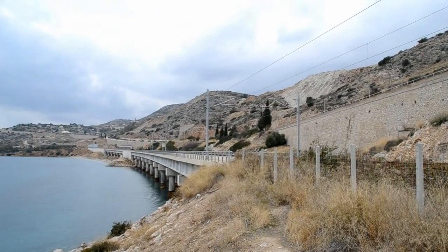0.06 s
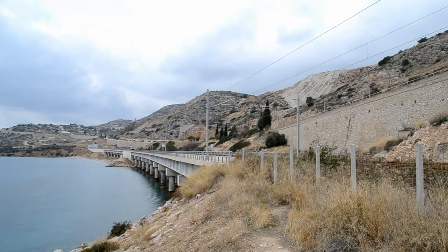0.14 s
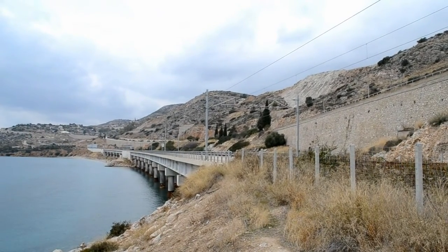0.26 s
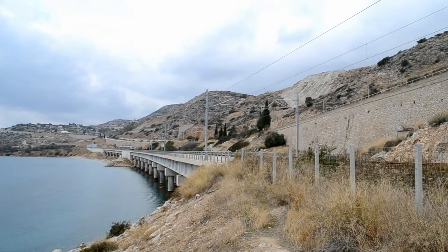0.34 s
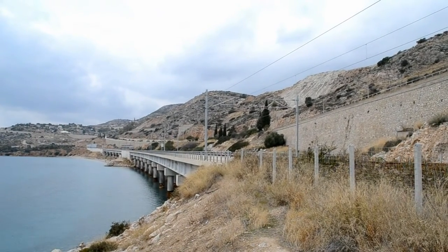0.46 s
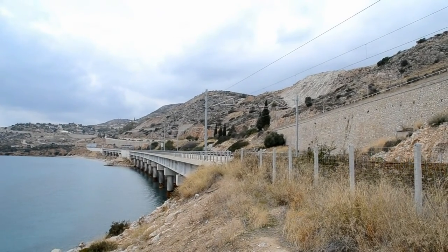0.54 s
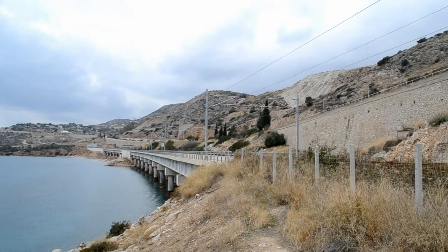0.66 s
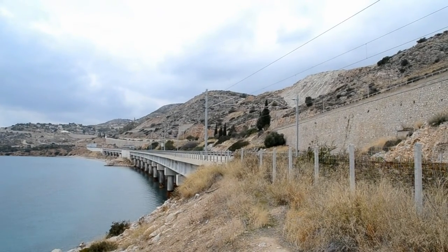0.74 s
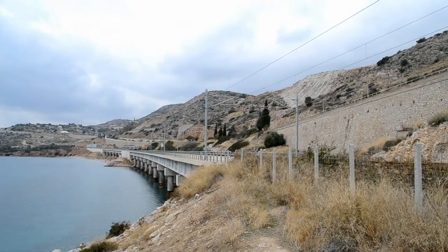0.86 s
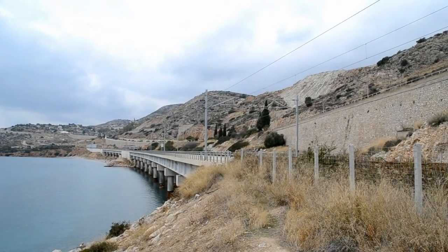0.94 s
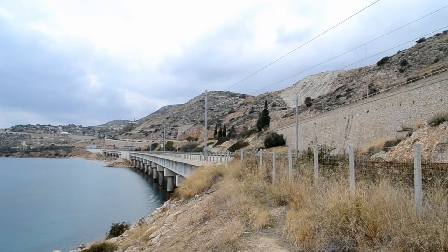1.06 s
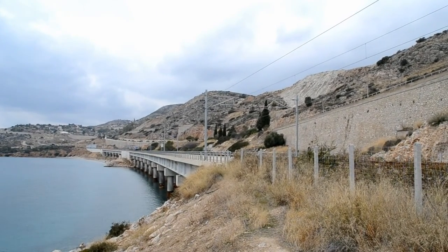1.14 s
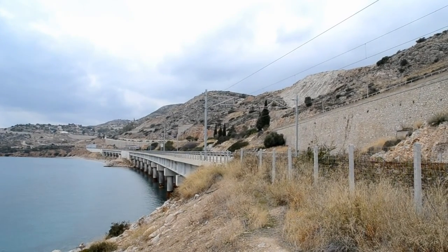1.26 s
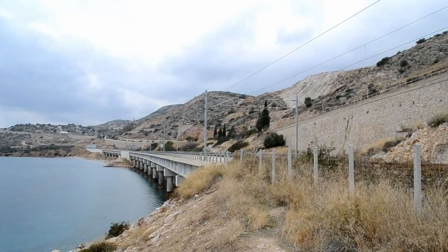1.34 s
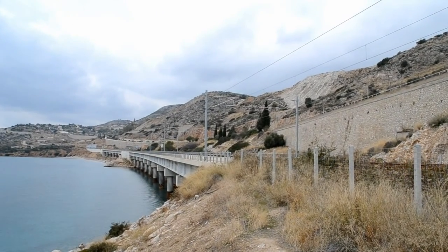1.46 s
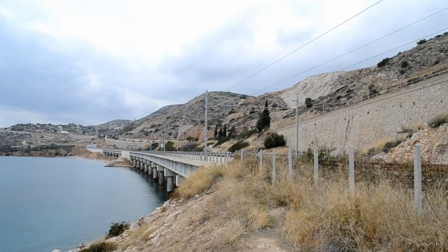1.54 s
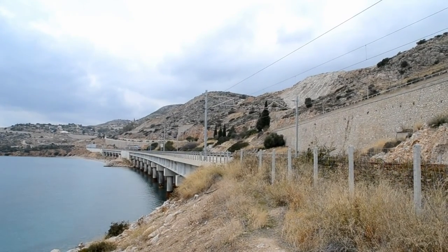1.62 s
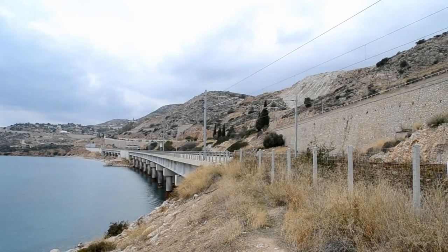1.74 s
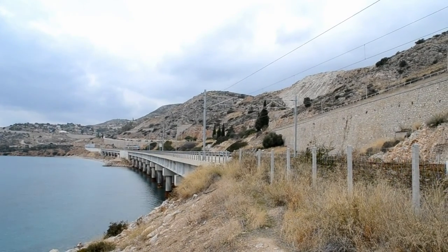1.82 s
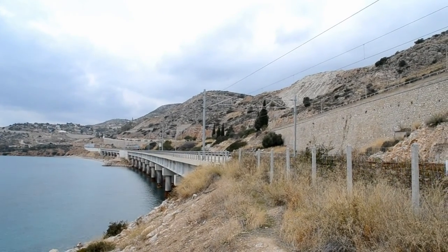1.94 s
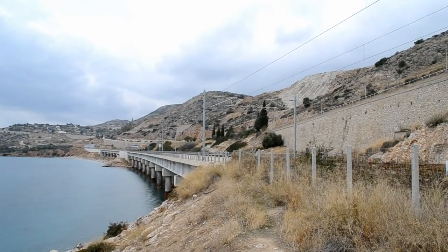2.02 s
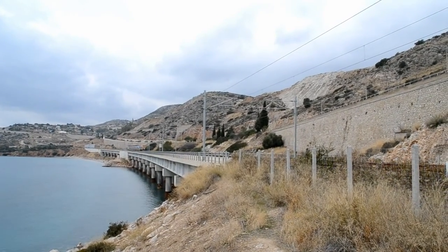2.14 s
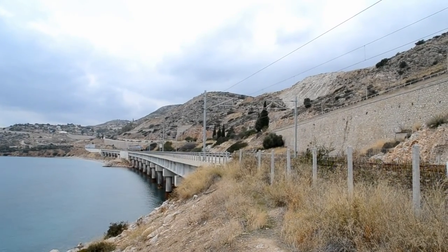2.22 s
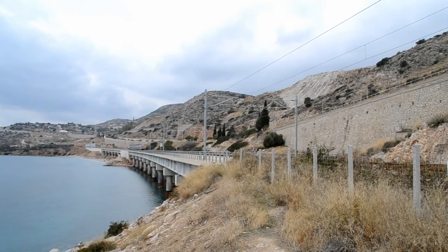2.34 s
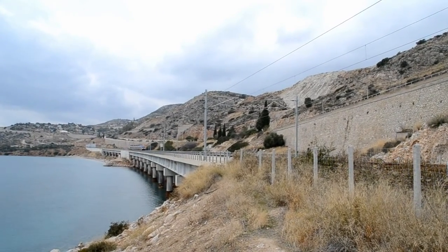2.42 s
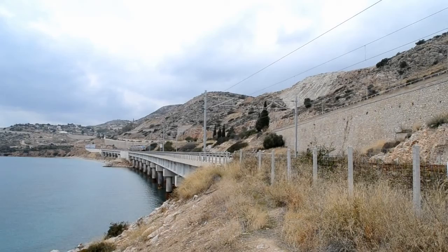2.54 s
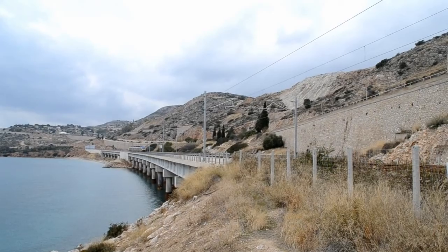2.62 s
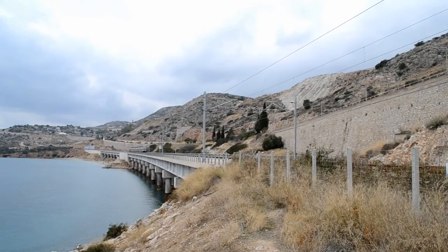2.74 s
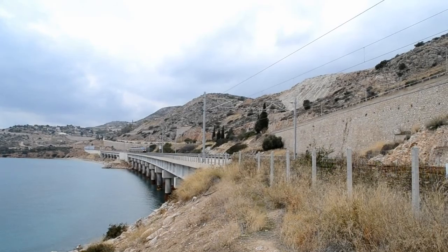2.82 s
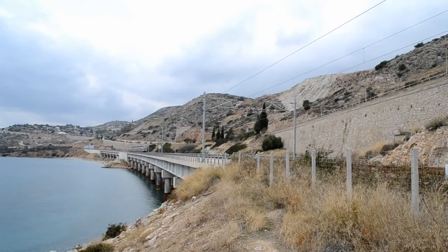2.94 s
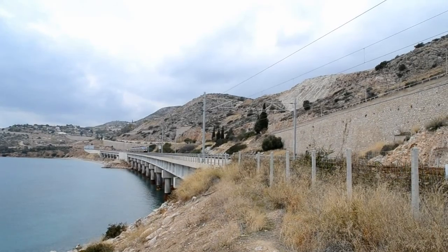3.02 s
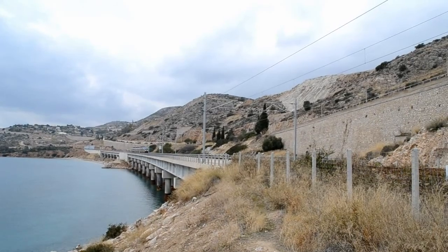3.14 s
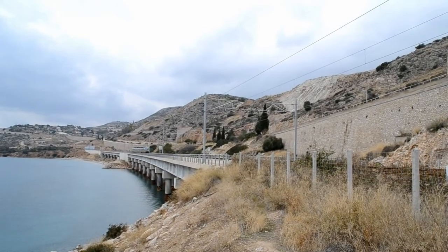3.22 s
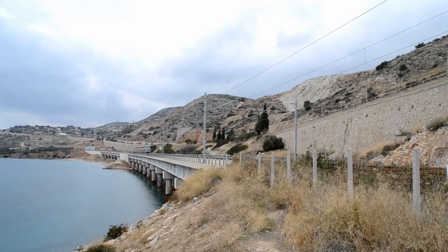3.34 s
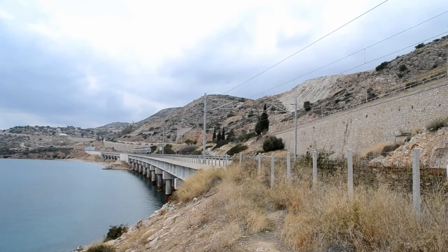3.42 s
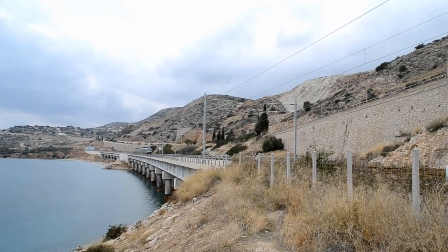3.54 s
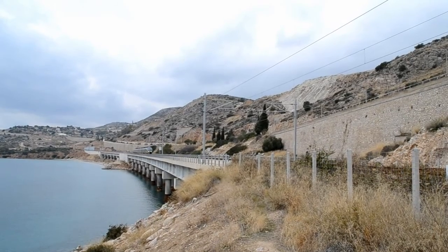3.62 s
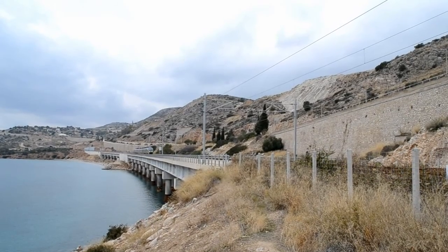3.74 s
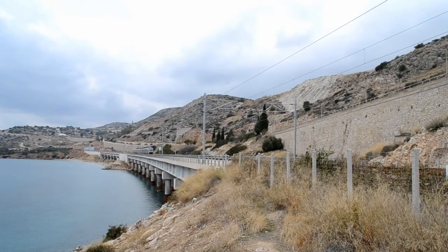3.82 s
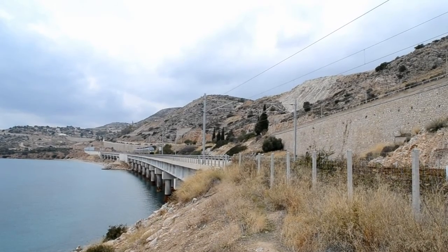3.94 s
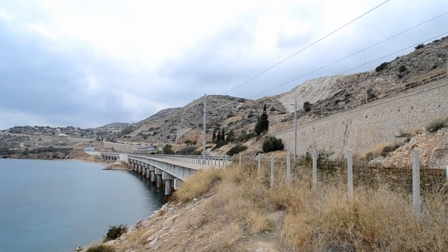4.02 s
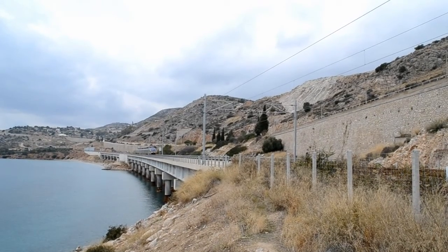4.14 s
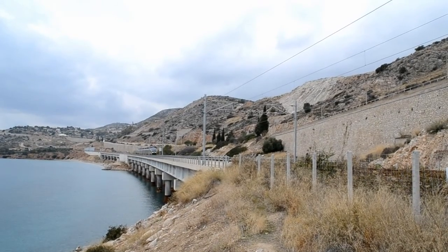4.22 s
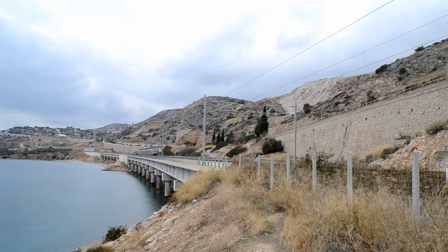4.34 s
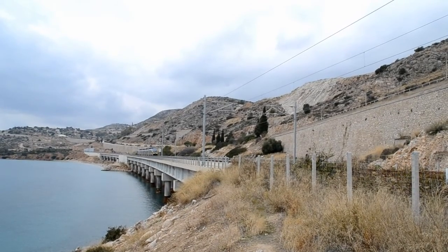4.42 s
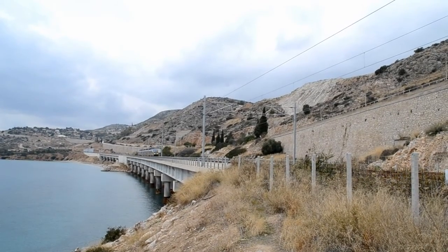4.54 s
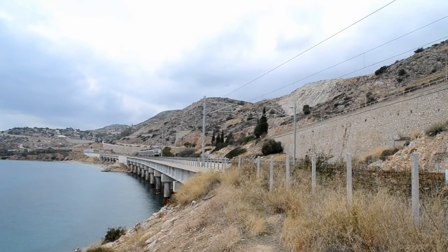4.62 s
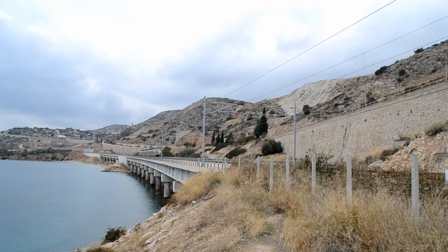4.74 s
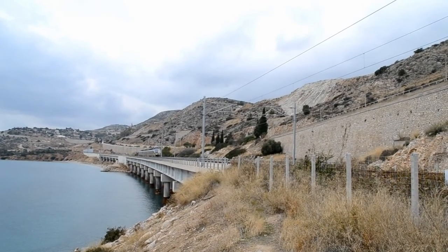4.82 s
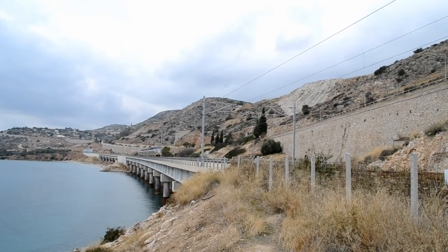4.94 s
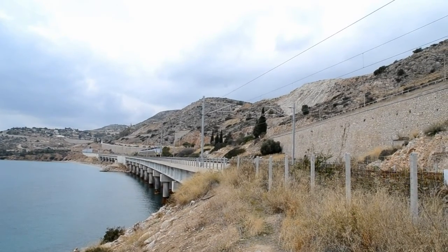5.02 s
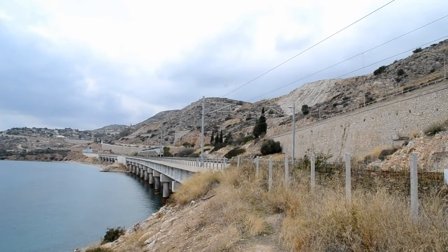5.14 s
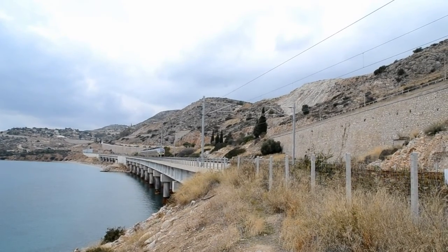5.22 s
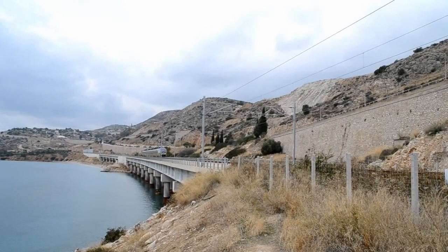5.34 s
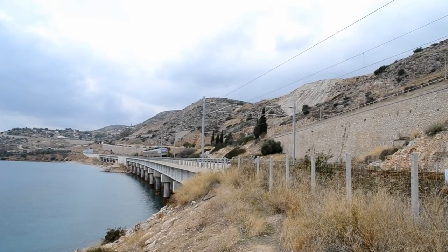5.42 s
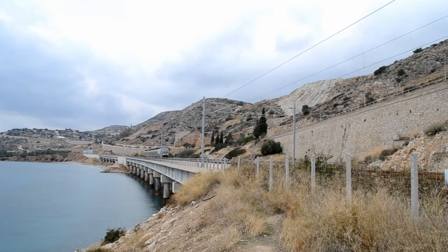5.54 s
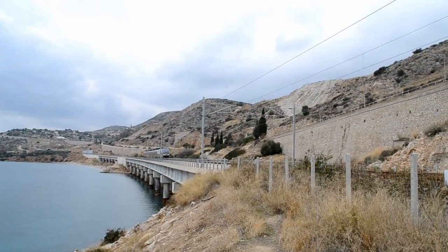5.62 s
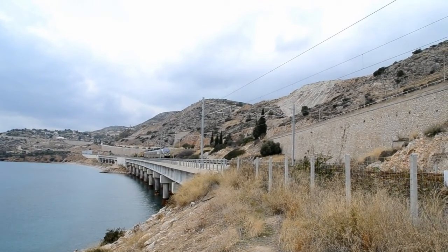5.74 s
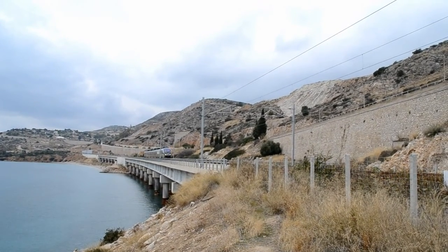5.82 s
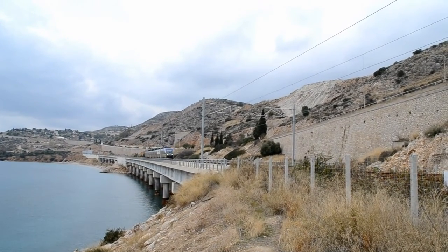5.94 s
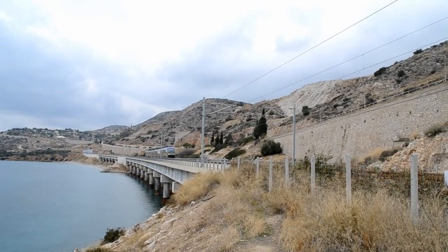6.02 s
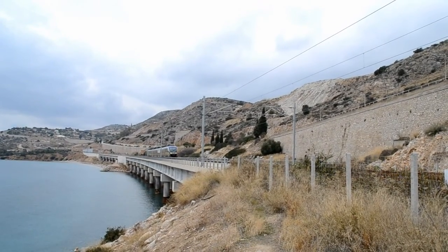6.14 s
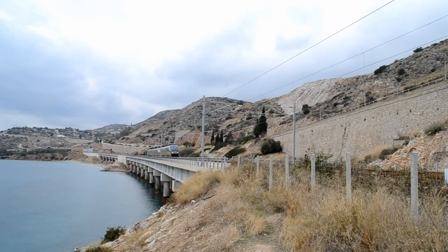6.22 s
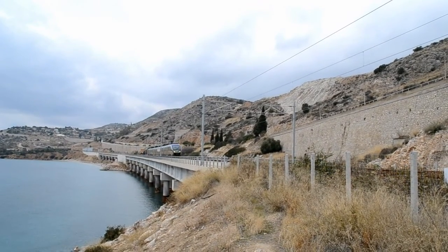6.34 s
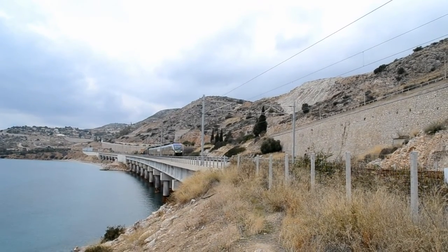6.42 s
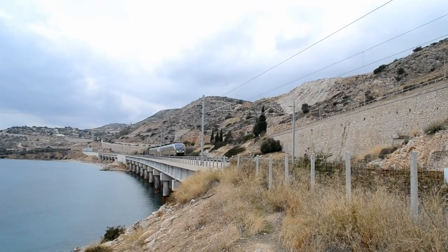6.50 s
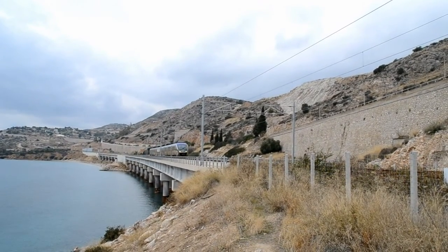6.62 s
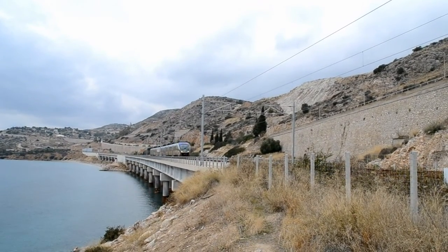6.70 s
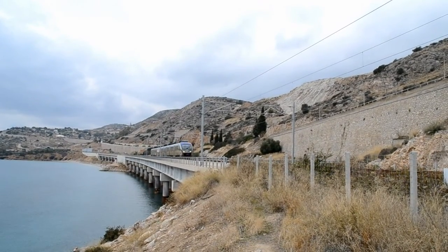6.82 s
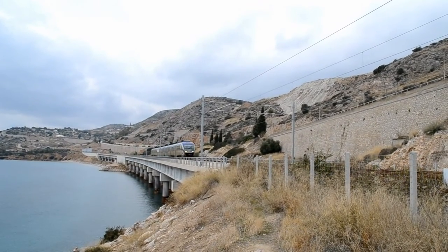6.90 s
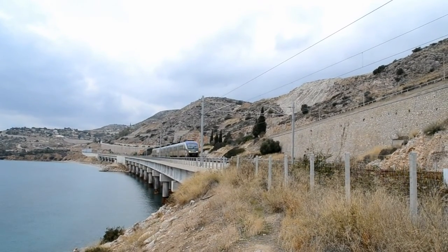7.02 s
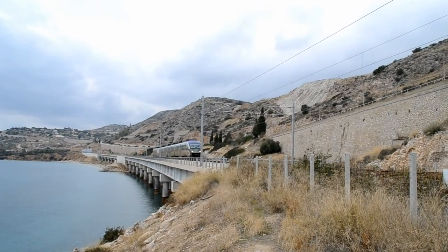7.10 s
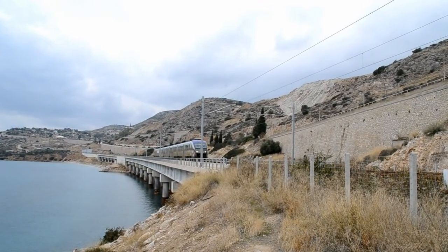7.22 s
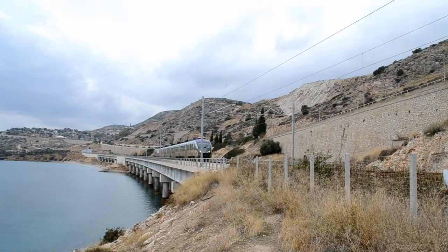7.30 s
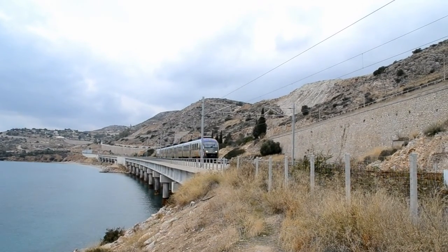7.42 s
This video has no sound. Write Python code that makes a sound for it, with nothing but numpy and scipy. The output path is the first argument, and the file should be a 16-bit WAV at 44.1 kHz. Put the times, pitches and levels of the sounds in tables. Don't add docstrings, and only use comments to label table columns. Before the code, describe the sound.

Quiet lakeside with breeze, lapping water and crackling dry grass; one hard click close by, then an electric train slowly swells nearer over a viaduct.

```python
import sys
import numpy as np
from scipy import signal
from scipy.fft import rfft, irfft, next_fast_len
from scipy.io import wavfile
from scipy.ndimage import uniform_filter1d, map_coordinates

SR = 44100
rng = np.random.default_rng(int(sys.argv[2]) if len(sys.argv) > 2 else 0)


def transcribe(signal):
    frames = np.atleast_2d(signal).T
    limited = np.clip(frames, -1, 1)
    pcm = np.round(limited * 32767).astype(np.int16)
    wavfile.write(sys.argv[1], SR, pcm)


def level_to_linear(level):
    exponent = np.asarray(level, float) / 20
    return 10 ** exponent


N = 329427


def unit(x):
    return x / np.sqrt(np.mean(x ** 2) + 1e-30)


def curves(rows):
    s, *cols = np.transpose(rows)
    return [np.interp(np.arange(N) / SR, s, c) for c in cols]


def wobble(rate):
    knots = rng.standard_normal(int(N * 40 / SR) + 4)
    return map_coordinates(knots, [np.arange(N) * min(rate, 40) / SR])


def filtered(x, response):
    m = next_fast_len(N + SR // 2)
    return irfft(rfft(x, m) * response(np.fft.rfftfreq(m, 1 / SR)), m)[:N]


def coloured(points):
    f, v = np.transpose(points)
    return lambda hz: level_to_linear(np.interp(np.log(hz + 1), np.log(f + 1), v))


def resonant(modes):
    def response(f):
        total = 0
        for k, (centre, width, db) in enumerate(modes):
            damping = 1j * f * width
            total = total + (-1) ** k * level_to_linear(db) * damping / (centre * centre - f * f + damping)
        return total
    return response


def steep(modes):
    return lambda f: resonant(modes)(f) ** 2


def rush(response, patchy_db, loss_db=None):
    hz, t, z = signal.stft(unit(filtered(rng.standard_normal(N), response)), SR, nperseg=512)
    field = uniform_filter1d(rng.standard_normal(z.shape), size=6, axis=0)
    field = uniform_filter1d(field, size=10, axis=1)
    z = z * level_to_linear(patchy_db * unit(field))
    if loss_db is not None:
        loss = np.interp(t * SR, np.arange(N), loss_db)
        z = z * level_to_linear(-loss * (hz[:, None] / 4000) ** 0.6)
    return signal.istft(z, SR, nperseg=512)[1][:N]


def grains(start_s, hz, cycles, size):
    k = np.arange(600)
    turn = hz[:, None] * k / SR
    envelope = np.exp(-turn / cycles) * (1 - np.exp(-turn / 0.78))
    shape = size[:, None] * np.sin(2 * np.pi * turn) * envelope
    at = np.round(start_s * SR).astype(int)[:, None] + k
    return np.bincount(at.ravel(), shape.ravel(), N + SR)[:N]


# time_s, breeze_db
BREEZE_LEVEL = [(0, -62), (.5, -59), (1.4, -63), (2.8, -59.5), (3.5, -61), (4.3, -59.5), (5.15, -54),
                (5.4, -59)]
# frequency_hz, density_db
BREEZE_SPECTRUM = [(12, -51), (20, -20), (81, -3.5), (161, -5), (192, -4.5), (226, -2.5), (367, -16.5),
                   (500, 0), (650, -17.5), (1100, -120)]


def breeze():
    level_db, = curves(BREEZE_LEVEL)
    return level_to_linear(level_db + 1.5 * wobble(7.1)) * rush(coloured(BREEZE_SPECTRUM), 1.13)


# start_s, swell_s, hold_s, dying_s, rustle_db
GUST_EVENTS = [
    (.05, 0.066, 0.22, .05, -76),
    (0.303, 0.023, 0.14, 0.21, -70.5),
    (0.387, 0.52, 0.28, .3, -64.5),
    (1.3, 0.19, .1, .05, -73.5),
    (1.7, 0.47, .33, .06, -73),
    (2.978, .04, 0.17, .1, -71.5),
    (3.25, .05, .15, .1, -79),
    (3.4, 0.14, 0.24, .15, -69.5),
    (3.864, 0.07, 0.17, .25, -68.5),
    (4.2, 0.083, .25, .1, -73.5),
]


def gusts():
    t = np.arange(N) / SR
    power = level_to_linear(-78.5 - 0.6 * t) ** 2
    for start, swell, hold, dying, db in GUST_EVENTS:
        rise = (t - start) / swell
        fall = 1 + (start + swell + hold - t) / dying
        power = power + (level_to_linear(db) * np.clip(np.minimum(rise, fall), 0, 1)) ** 2
    return 10 * np.log10(power)


# frequency_hz, density_db
RUSTLE_SPECTRUM = [(2060, -23), (3500, 2.5), (3670, -2.5), (4140, -18), (5600, -13), (6400, -17.5),
                   (7050, -31), (7470, -24.5), (8380, -17.5), (9630, -16.5), (10100, -21), (11000, -32),
                   (14300, -62), (22000, -120)]


def rustle(flutter):
    level_db = gusts()
    draw = rng.random((3000, 3))
    size = level_to_linear(16 * draw[:, 2] ** 2.5)
    crackle = grains(draw[:, 0] * N / SR, 4000 * 2.9 ** draw[:, 1], 2.1, size)
    crackle = unit(filtered(crackle, coloured(RUSTLE_SPECTRUM)))
    smooth = level_to_linear(1.1 * flutter + 2.7 * wobble(38)) * rush(coloured(RUSTLE_SPECTRUM), 1.2)
    return level_to_linear(level_db + 4) * (smooth + 0.67 * crackle)


# crest_s, wash_db
CRESTS = [
    (.5, -59),
    (1.05, -56.5),
    (2.05, -58),
    (3.65, -61),
    (4.03, -52.5),
    (4.6, -63.5),
]


def waves():
    run_up_db_per_s, drain_db_per_s = 13, 11
    t = np.arange(N) / SR
    power = level_to_linear(-60.5) ** 2
    for s, db in CRESTS:
        below_crest = np.where(t < s, run_up_db_per_s * (s - t), drain_db_per_s * (t - s))
        power = power + level_to_linear(db - below_crest) ** 2
    return 10 * np.log10(power)


# frequency_hz, density_db
WASH_SPECTRUM = [(180, -28), (300, -9.5), (432, 0), (566, -2.5), (886, -0.5), (951, -1.5), (1070, -2),
                 (1730, -6), (2500, -6), (3600, -12), (5000, -30), (6500, -44), (11000, -120)]


def wash(flutter):
    return level_to_linear(waves() + 3.5 + 0.35 * flutter) * rush(coloured(WASH_SPECTRUM), 1.0)


def foam():
    return level_to_linear(-66 + 2.1 * (waves() + 57)) * rush(steep([(2200, 950, 0)]), 1.5)


# pitch_hz, width_hz, level_db, start_s
DRONES = [
    (9460, 90, -91.5, 4.6),
    (7837, 6, -101, 0.1),
    (7897, 4, -99, .1),
]


def insects():
    t = np.arange(N) / SR
    total = np.zeros(N)
    for hz, width, db, start in DRONES:
        drone = unit(filtered(rng.standard_normal(N), steep([(hz, width, 0)])))
        total += level_to_linear(db) * drone * np.clip((t - start) / 0.24, 0, 1)
    return total


# start_s, peak_db, pitch_hz
STEM_TICKS = [(0.1241, -58, 5450), (0.1396, -54, 5590), (0.1925, -55, 5790), (0.3795, -53, 5230),
              (0.4414, -56, 4510), (0.5661, -49, 4550), (0.601, -51, 4400), (0.9358, -30, 4880),
              (1.1568, -55, 4900), (1.2251, -54, 5620), (1.2346, -51, 5830), (1.3458, -54, 6090),
              (1.4696, -53, 4870), (1.5359, -56, 5240), (1.5524, -50, 5060), (2.592, -52, 4950),
              (2.7487, -60, 4550), (2.9981, -50, 4450), (3.0869, -55, 5500), (3.1223, -46, 4400),
              (3.1477, -53, 6040), (3.2395, -56, 6150), (3.7, -48, 4400), (3.7239, -52, 5640),
              (3.7599, -56, 5780), (3.7833, -55, 4620), (3.9774, -55, 4510), (4.8135, -60, 5260)]
# start_s, peak_db, pitch_hz
STALK_TICKS = [(0.3325, -39, 2440), (0.8234, -43, 3480), (1.162, -53, 3500), (1.2874, -47, 2450),
               (3.1244, -44, 1980), (3.1794, -37, 1970), (3.5632, -33.5, 2280), (4.123, -35, 2070),
               (4.258, -43, 2030), (4.731, -43, 2480), (4.8349, -44, 2140)]
# start_s, peak_db, pitch_hz
BLADE_TICKS = [(0.192, -60, 9890), (0.3162, -61, 9160), (0.3825, -60, 8340), (0.8056, -56, 9560),
               (0.9358, -41, 7510), (1.07, -50, 8340), (1.1358, -58, 8500), (1.2077, -59, 9640),
               (1.3339, -55, 8660), (1.5374, -58, 8330), (1.5713, -54, 9600), (1.6975, -62, 8860),
               (1.8267, -58, 8620), (2.4149, -62, 8470), (3.0305, -61, 9770), (3.1532, -58, 8060),
               (3.1732, -57, 9530), (3.2425, -63, 9660), (3.4291, -58, 8270), (3.5438, -60, 9140),
               (3.7, -60, 9160), (3.7853, -58, 8710), (3.8237, -52, 8540), (3.91, -59, 8480),
               (3.9539, -59, 8490), (3.9774, -49, 8600), (4.0163, -54, 8480), (4.2717, -57, 9880)]


def stems():
    rows = STEM_TICKS + STALK_TICKS + BLADE_TICKS
    s, db, hz = np.transpose([row for row in rows if not .93 < row[0] < .94])
    draw = rng.random((90, 3))
    at = draw[:, 0] * (N - 1)
    patter_db = gusts()[at.astype(int)] + 11.5 + 8 * (draw[:, 2] - .5)
    s = np.r_[s, at / SR]
    hz = np.r_[hz, 4000 * 2.4 ** draw[:, 1]]
    db = np.r_[db, patter_db]
    clicks = grains(s, hz, 1.7 + hz[:, None] / 1700, level_to_linear(db + 3.0))
    overtones = grains(s + .001, 1.6 * hz, 6.4, level_to_linear(db - 7.5) * (hz < 6300))
    return clicks + overtones


# start_s, peak_db, pitch_hz, life_cycles
PUSHES = [
    (0.484, -40, 170, .36),
    (0.771, -42.5, 140, 0.34),
    (1.84, -38, 275, 0.32),
    (2.897, -46, 195, 0.73),
    (3.068, -36, 240, 0.32),
]


def bumps():
    out, t = np.zeros(N + SR), np.arange(SR // 10) / SR
    for s, db, hz, life in PUSHES:
        swing = np.sin(2 * np.pi * hz * t) * (hz * t) * np.exp(-hz * t / life)
        out[round((s + .009) * SR):][:len(t)] += level_to_linear(db + 15.0) * swing
    return out[:N]


# start_s, level_db
CONTACTS = [
    (0.9365, -16.5),
    (0.9403, -22.5),
    (0.9472, -40),
]
# pitch_hz, level_db, t60_s
SHELL_MODES = [(820, -12.5, 0.027), (1320, -9, 0.013), (1520, -1.5, 0.014), (2040, -11, 0.012),
               (2460, -1.5, 0.022), (3280, 4, 0.012), (3550, 3, 0.0046), (4870, -6.5, 0.0067),
               (6900, -10, 0.005), (9900, -28, 0.0023)]


def snap():
    out, crack, t = np.zeros(N + SR), np.zeros(N + SR), np.arange(SR // 10) / SR
    for s, db in CONTACTS:
        rise = level_to_linear(db) * (1 - np.exp(-(t / 0.00055) ** 2))
        ring = np.zeros(len(t))
        for k, (hz, level, t60) in enumerate(SHELL_MODES):
            decay = level_to_linear(level + rng.normal(0, 1) - 60 * t / t60)
            onset = 1 - np.exp(-(hz * t) ** 2)
            ring += decay * onset * np.cos(2 * np.pi * hz * (t - .0007) - 1.1 * k)
        at = round(s * SR)
        out[at:][:len(t)] += rise * ring
        crack[at:][:len(t)] += rise * level_to_linear(-8.5 - 60 * t / 0.0095) * rng.standard_normal(len(t))
    return out[:N] + filtered(crack[:N], resonant([(6300, 2600, 0)]))


def arrival():
    return np.clip((np.arange(N) / SR - 2.2) / 0.83, 0, 1)


# time_s, roar_db
ROAR_LEVEL = [(2.2, -43), (2.62, -53), (2.86, -52), (3.33, -55), (4.09, -52.5), (4.42, -48.5),
              (4.81, -49.5), (5.56, -47), (6.53, -44.5), (7.1, -41.5), (7.47, -40.5)]
# time_s, loss_at_4khz_db
AIR_LOSS = [(2.2, 10), (4.4, 22.5), (5, 18.5), (5.5, 13.5), (6, 8), (6.4, 3), (6.8, 0), (7.47, 1.5)]
# frequency_hz, density_db
ROAR_SPECTRUM = [(24, -53), (40, -21.5), (180, -7.5), (340, -11.5), (373, -6.5), (671, -3.5), (1330, -4),
                 (1460, -6.5), (2030, -6), (3320, -10.5), (4510, -25.5), (7300, -36.5), (7950, -48.5),
                 (9340, -39.5), (11000, -78), (14300, -99), (22000, -120)]


def rolling_roar():
    level_db, = curves(ROAR_LEVEL)
    loss_db = curves(AIR_LOSS)[0].clip(0)
    noise = level_to_linear(level_db + 6.5 + 0.44 * wobble(25)) * rush(coloured(ROAR_SPECTRUM), 0.71, loss_db)
    return arrival() * noise


# time_s, high_song_db, low_song_db
RAIL_FLARES = [(4.3, 2, 3), (4.43, 3.5, -2), (4.58, -1, -4), (4.72, 2.5, 0), (4.87, 1, 3), (5.02, 4, 2),
               (5.2, 3.5, 3), (5.4, 3, 5), (5.72, 6.5, 8), (5.95, 5.5, -1), (6.1, 2, 7), (6.37, 7, 2),
               (6.55, -7, -11), (6.85, -1, 2), (7.05, 5, 8.5), (7.17, -4.5, 3.5), (7.33, 4.5, 5),
               (7.45, 2.5, 5.5)]


def song_levels():
    flare_s = 0.067
    t = np.arange(0, N, 64) / SR
    s, *lifts = np.transpose(RAIL_FLARES)
    bell = np.exp(-.5 * ((t[:, None] - s) / flare_s) ** 2)
    levels = []
    for start_db, lift in zip((-70, -72), lifts):
        level = start_db + 4.5 * (t - 2.2) + bell @ lift
        levels.append(np.interp(np.arange(N) / SR, t, level))
    return levels


# pitch_hz, width_hz, level_db
RAIL_MODES = [(1261, 34, -6), (1320, 36, -2.5), (1359.5, 29.5, -3)]
# pitch_hz, width_hz, level_db
DECK_MODES = [(1041, 36, -5.5), (1138, 36, -2.5), (1208, 24, -4)]


def rail_song():
    high_db, low_db = song_levels()
    high = level_to_linear(high_db + 0.5 + 1.8 * wobble(30)) * rush(steep(RAIL_MODES), 0.35)
    low = level_to_linear(low_db - 0.8 + 2.2 * wobble(24)) * rush(steep(DECK_MODES), 0.35)
    return arrival() * (high + low)


# time_s, pitch_hz, level_db
CALL = [
    (2.37, 7330, -88),
    (2.42, 7380, -83),
    (2.46, 7300, -87),
    (2.472, 7000, -99),
    (2.486, 7103, -89),
    (2.532, 7132, -80),
    (2.574, 6940, -90),
    (2.58, 6885, -93),
]


def bird():
    hz, db = curves(CALL)
    t = np.arange(N) / SR
    sounding = np.clip(np.minimum(t - CALL[0][0], CALL[-1][0] - t) / .012, 0, 1)
    return np.sqrt(2) * level_to_linear(db) * sounding * np.sin(2 * np.pi * np.cumsum(hz) / SR)


def deck_hum():
    turns = np.cumsum(373.5 + 2.5 * wobble(25)) / SR
    level_db = -49 + 10 * (np.arange(N) / SR - 7.5)
    return level_to_linear(level_db + 2.3 * wobble(7.2)) * np.sin(2 * np.pi * turns)


# start_s, peak_db
JOINT_KNOCKS = [(4.964, -43), (5.207, -49), (5.425, -43), (5.492, -36), (5.537, -45), (5.676, -27.5),
                (5.705, -30), (5.766, -29), (5.943, -33), (6.006, -31), (6.029, -29.5), (6.094, -24),
                (6.226, -19.5), (6.267, -41), (6.304, -23), (6.634, -23), (6.947, -23), (6.981, -28)]
# pitch_hz, width_hz, level_db
WHEEL_MODES = [(700, 360, -1.5), (1300, 295, 0), (2080, 620, -3), (3140, 900, -11.5)]


def wheel_knocks():
    s, db = np.transpose(JOINT_KNOCKS)
    burst = np.zeros(N)
    burst[np.round(s * SR).astype(int)] = level_to_linear(db + 4.5)
    smear = level_to_linear(-60 * np.arange(2000) / SR / 0.041)
    burst = signal.fftconvolve(burst, smear)[:N]
    softened = lambda f: resonant(WHEEL_MODES)(f) / (1 + 1j * f / 3500) ** 3
    return filtered(burst * rng.standard_normal(N), softened)


# frequency_hz, density_db
HISS_SPECTRUM = [(2650, -33), (4500, -2), (7520, -8), (8890, -16), (9480, -10), (9770, -16), (11000, -26),
                 (14300, -57), (22000, -120)]


def circuit_hiss():
    return level_to_linear(-78.5) * rush(coloured(HISS_SPECTRUM), .6)


# frequency_hz, density_db
LEAK_SPECTRUM = [(11000, -60), (11600, -9), (12200, -11), (14000, -0.5), (15500, -5), (15800, -61)]


def treble_leak():
    return level_to_linear(0.4 * gusts() - 73.0 + .8 * wobble(30)) * rush(coloured(LEAK_SPECTRUM), .8)


def scene():
    flutter = wobble(22)
    nature = breeze() + rustle(flutter) + wash(flutter) + foam() + insects() + stems() + bird()
    handling = bumps() + snap()
    train = rolling_roar() + rail_song() + deck_hum() + wheel_knocks()
    return (nature + handling + train)[None]


def low_pass(x):
    return signal.sosfilt(signal.butter(12, 15700, fs=SR, output="sos"), x)


def record(dry):
    def microphone(f):
        housing_dip = 1 - 0.099 * np.exp(-((f - 7200) / 500) ** 2)
        return housing_dip / (1 + (f / 10900) ** 34)
    heard = filtered(dry[0], microphone)
    mix = (heard + circuit_hiss() + treble_leak())[None]
    return low_pass(mix)


dry = scene()
out = record(dry)
transcribe(out)
```